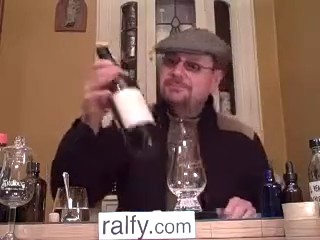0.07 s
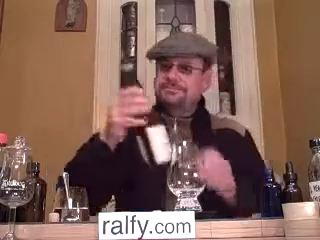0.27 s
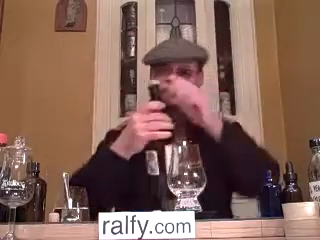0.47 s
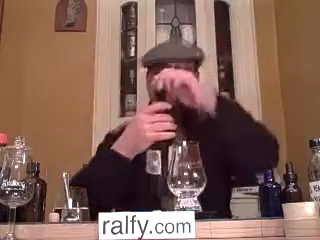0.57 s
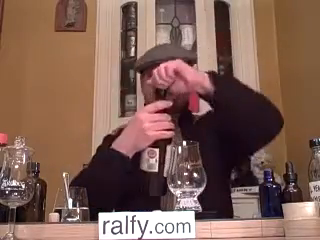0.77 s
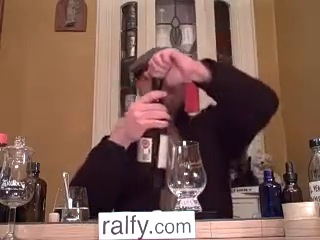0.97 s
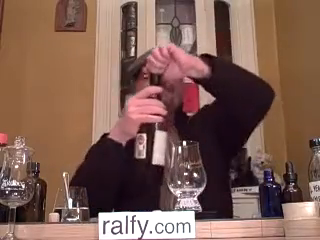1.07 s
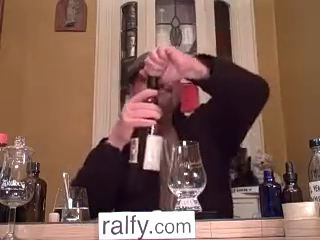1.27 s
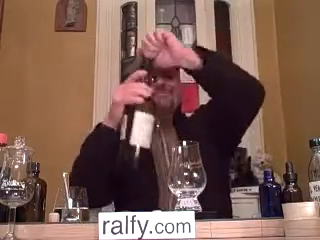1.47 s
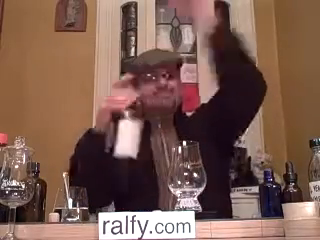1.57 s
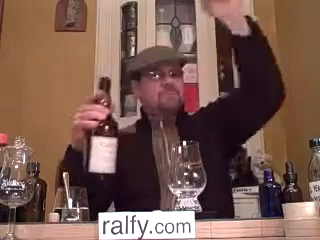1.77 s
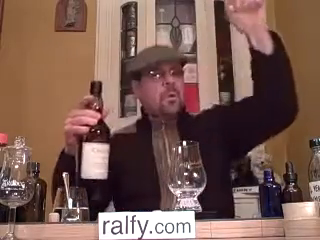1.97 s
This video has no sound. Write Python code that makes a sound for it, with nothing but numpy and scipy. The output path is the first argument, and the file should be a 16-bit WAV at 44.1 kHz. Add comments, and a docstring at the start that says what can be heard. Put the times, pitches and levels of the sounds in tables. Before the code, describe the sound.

A cork pops sharply from a glass bottle after quiet handling, leaving a short hollow ring indoors

```python
"""A cork is pulled from a glass bottle in a small quiet room, with a low wavering hum and microphone hiss throughout.
First a soft rustle fades out under soft low bumps of hands, a few tiny clicks and a faint glassy tone.
Then air squeaks past the slipping cork (rising sines, noise), and the neck pops: a gliding sine over a burst.
The neck tone hangs and beats in the room; small resonant clicks, a glassy tone and a last bump follow."""
import sys
import numpy as np
from scipy import signal
from scipy.fft import rfft, irfft, next_fast_len
from scipy.io import wavfile
from scipy.ndimage import map_coordinates

SR = 44100
rng = np.random.default_rng(int(sys.argv[2]) if len(sys.argv) > 2 else 0)


def store_pcm(level_fs):
    """Save levels as 16-bit WAV."""
    pcm = np.round(np.clip(level_fs, -1, 1) * 32767).astype(np.int16)
    wavfile.write(sys.argv[1], SR, np.atleast_2d(pcm).T)


def volts_from_db(level):
    """Convert decibel levels to linear amplitude ratios."""
    exponent = np.asarray(level, float) / 20
    return 10 ** exponent


N = 89567
T = np.arange(N) / SR


def noise():
    """White noise, rms 1."""
    return rng.standard_normal(N)


def unit(x):
    """Scales to rms 1."""
    return x / np.sqrt(np.mean(x ** 2) + 1e-20)


def impulse(t_s):
    """A single unit sample."""
    return (np.arange(N) == round(t_s * SR)) * 1.


def sine(hz):
    """Sine of peak 1 whose phase sums a varying frequency."""
    return np.sin(2 * np.pi * np.cumsum(hz) / SR)


def tone(rows):
    """Sine gliding through (t/s, f/Hz, rms level/dB) rows."""
    t_s, hz, db = np.transpose(rows)
    level = volts_from_db(np.interp(T, t_s, db, left=-120))
    return np.sqrt(2) * level * sine(np.interp(T, t_s, hz))


def dying(start_s, t60_s):
    """Envelope that starts at once and decays exponentially."""
    return (T >= start_s) * volts_from_db(-60 * np.clip(T - start_s, 0, None) / t60_s)


def colour(x, points):
    """Zero-phase filter through (f/Hz, gain/dB) points, interpolated in log frequency."""
    size = next_fast_len(len(x) + 8192)
    f, db = np.transpose(points)
    log_hz = np.log(np.fft.rfftfreq(size, 1 / SR) + 1)
    gain = volts_from_db(np.interp(log_hz, np.log(f + 1), db))
    return irfft(rfft(x, size) * gain, size)[:len(x)]


# reverberation: (f/Hz, t60/s)
ROOM_DECAY = [(60, 0.43), (200, 0.44), (500, 0.3), (800, 0.66), (1300, 0.56), (2200, 0.31), (3200, 0.29),
              (4400, 0.29), (6000, .3), (8000, .27)]
ROOM_GAP_S, LUMPY_DB, LUMPS_PER_S = .003, 2, 500


def room(x):
    """Diffuse tail: noise dying at its own speed per frequency, uneven from separate wall echoes."""
    hz, t_s, bins = signal.stft(rng.standard_normal(SR // 2), SR, nperseg=256)
    f, t60_s = np.transpose(ROOM_DECAY)
    decay = volts_from_db(-60 * t_s / np.interp(hz, f, t60_s)[:, None])
    tail = signal.istft(bins * decay, SR, nperseg=256)[1]
    lump_at = np.arange(len(tail)) * LUMPS_PER_S / SR
    lumps = map_coordinates(rng.standard_normal(400), [lump_at])
    tail = tail * volts_from_db(LUMPY_DB * lumps)
    tail = tail / np.linalg.norm(tail)  # unit energy
    tail = np.pad(tail, (round(ROOM_GAP_S * SR), 0))
    return signal.fftconvolve(x, tail)[:N]


def swell(t_s, grow_db_per_ms, cut_db_per_ms):
    """Exponential growth that turns into an exponential cut-off; 1 at t_s."""
    ms = (T - t_s) * 1000
    growing = volts_from_db(np.clip(-grow_db_per_ms * ms, -99, 200))
    cutting = volts_from_db(np.clip(cut_db_per_ms * ms, -99, 200))
    return 2 / (growing + cutting)


# whistles of air past the cork; the last row is an early echo off a surface:
# (t/s, start f/Hz, end f/Hz, level at t/dB, growth/dB per ms, cut-off/dB per ms)
WHISTLES_AND_ECHO = [(1.5881, 3850, 4100, -18, 7, 12), (1.5915, 4250, 4750, -5.5, 7, 13),
                     (1.5892, 7500, 7700, -15, 11, 11), (1.594, 8000, 8100, -23, 12, 12)]
GLIDE_S, SQUEAK_ROOM_DB = 0.0026, -9.5
SEAL_S, SEAL_DB, SEAL_RISE_DB_PER_MS, SEAL_FALL_DB_PER_MS = 1.5895, -25, 6.5, 2.5


def squeak():
    """Whistles grow fast, rise in pitch and are cut as the gap opens; an early echo; hiss as the seal gives way."""
    whistles = np.zeros(N)
    for t_s, hz0, hz1, db, grow, cut in WHISTLES_AND_ECHO:
        hz = np.interp(T, [t_s - GLIDE_S, t_s + GLIDE_S / 2], [hz0, hz1])
        whistles += volts_from_db(db) * swell(t_s, grow, cut) * sine(hz)
    seal = volts_from_db(SEAL_DB) * swell(SEAL_S, SEAL_RISE_DB_PER_MS, SEAL_FALL_DB_PER_MS) * noise()
    return whistles + seal + volts_from_db(SQUEAK_ROOM_DB) * room(whistles)


# neck tone swelling and beating in the room: (t/s, f/Hz, rms level/dB)
NECK_TONE = [(1.5935, 560, -50), (1.5955, 630, -20), (1.601, 700, -16.5), (1.607, 720, -19),
             (1.611, 715, -25), (1.619, 685, -19), (1.627, 710, -24), (1.633, 715, -40), (1.645, 670, -28),
             (1.66, 715, -35), (1.685, 716, -38), (1.7, 716, -33), (1.71, 716, -36), (1.725, 716, -34),
             (1.78, 716, -47), (1.79, 716, -44), (1.81, 716, -50), (1.84, 716, -45), (1.88, 716, -56),
             (1.93, 716, -66), (1.96, 716, -72), (1.972, 710, -54), (2.0, 710, -66)]
# spectrum of the air burst as the room returns it: (f/Hz, relative level/dB)
BURST_SPECTRUM = [(40, -23.5), (160, -14.5), (300, 4), (600, 3.5), (850, -14.5), (1400, -22), (2000, -24.5),
                  (3100, -16), (3700, 2.5), (4400, 3), (5300, -4), (6000, -36.5), (6600, -16.5),
                  (7400, -6.5), (8400, -8.5), (9300, -28)]
BURST_S, BURST_DB = 1.589, 13


def pop():
    """The neck's air resonates as one gliding tone while the burst spreads in the room."""
    burst = colour(room(impulse(BURST_S)), BURST_SPECTRUM)
    burst = burst * (T > BURST_S)  # the zero-phase filter also rings early
    return tone(NECK_TONE) + volts_from_db(BURST_DB) * burst


# small clicks: (t/s, dry peak level/dB, centre f/Hz, width of each filter pass/Hz, room level re dry/dB)
CLICK_ROWS = [(.184, -57, 3000, 1400, -3.5), (0.188, -52.5, 1840, 1000, -2), (.19, -52.5, 3240, 1400, -8),
              (.2, -57, 3300, 1400, -9), (.272, -59, 2000, 1500, -9), (1.04, -57, 1802, 2500, -6),
              (1.626, -37, 1116, 400, -8), (1.788, -47, 3700, 600, 2), (1.799, -49.5, 5500, 2500, 4.5),
              (1.814, -43, 3740, 840, 2.5), (1.818, -38.5, 1680, 1100, 0.5), (1.82, -43, 964, 300, -6),
              (1.822, -67, 3800, 3000, -1), (1.9667, -31, 3600, 4010, -2), (1.968, -48.5, 600, 600, 1),
              (1.971, -36.5, 2230, 1010, -2.5), (1.974, -37, 2600, 1500, -2.5), (1.978, -44, 4800, 600, -3),
              (1.9947, -38, 1310, 900, -1), (1.995, -47.5, 395, 500, 0), (2.001, -43.5, 1280, 514, -5.5),
              (2.013, -55, 1500, 696, -7)]
SCRAPE_DB, SCRAPE_T60_S = -16, 0.026  # re impulse, before the resonance


def clicks():
    """An impulse dragging a short scrape, passed twice through one resonance."""
    out = np.zeros(N)
    for t_s, db, hz, width_hz, room_db in CLICK_ROWS:
        b, a = signal.iirpeak(hz, hz / width_hz, SR)
        scrape = volts_from_db(SCRAPE_DB) * dying(t_s, SCRAPE_T60_S) * noise()
        click = signal.lfilter(b, a, impulse(t_s) + scrape)
        click = signal.lfilter(b, a, click)
        click = click * volts_from_db(db) / np.abs(click).max()
        out += click + volts_from_db(room_db) * room(click)
    return out


# faint glassy tones: (start t/s, f/Hz, level before rise and decay/dB, rise/s, t60/s)
GLASS_TONES = [(1.835, 1000, -48, .1, .45), (.655, 2480, -59, .03, .16)]


def glass():
    """Steady-pitched sines that rise softly and ring away."""
    out = np.zeros(N)
    for t_s, hz, db, rise_s, t60_s in GLASS_TONES:
        rise = 1 - np.exp(-np.clip(T - t_s, 0, None) / rise_s)
        out += volts_from_db(db) * dying(t_s, t60_s) * rise * np.sin(2 * np.pi * hz * T)
    return out


# soft bumps of hands and clothes: (t/s, level of the dip/dB, f/Hz)
BUMP_ROWS = [(0.128, -52, 185), (0.142, -54, 150), (0.261, -52, 190), (0.37, -52, 147), (0.42, -55.5, 95.5),
             (0.603, -51.5, 89), (0.743, -53, 154), (0.868, -54.5, 96), (1.038, -56.5, 80.7),
             (1.131, -57.5, 80), (1.193, -51.5, 232), (1.364, -53, 94.5), (1.437, -50, 145),
             (1.518, -60, 80), (1.905, -52.5, 81.4)]
BUMP_CYCLES, BUMP_LAG_S = .5, 0.00915  # bell half-width; delay of the dip after t
BUMP_RUSTLE_DB, RUSTLE_HZ = -10.5, 600  # re dip; low-pass corner


def bumps():
    """Low dips of pressure, about one cycle long, with a little rustle."""
    out = np.zeros(N)
    b, a = signal.butter(2, RUSTLE_HZ, fs=SR)
    rustle = volts_from_db(BUMP_RUSTLE_DB) * unit(signal.lfilter(b, a, noise()))
    for t_s, db, hz in BUMP_ROWS:
        cycles = (T - t_s - BUMP_LAG_S) * hz
        bell = np.exp(-(cycles / BUMP_CYCLES) ** 2)
        out -= volts_from_db(db) * (np.cos(2 * np.pi * cycles) + rustle) * bell
    return out


# rustle spectrum: (f/Hz, relative level/dB)
SHUFFLE_SPECTRUM = [(150, -20), (350, 0.5), (1300, -4), (2500, -19.5), (5000, -29)]
SHUFFLE_START_DB, SHUFFLE_T60_S = -67, 0.82


def shuffle():
    """Dull noise that fades out from the start."""
    rustle = unit(colour(noise(), SHUFFLE_SPECTRUM))
    return volts_from_db(SHUFFLE_START_DB) * rustle * dying(0, SHUFFLE_T60_S)


# low hum: (t/s, f/Hz, rms level before waver/dB)
HUM_TONE = [(0.0, 36.7, -62), (0.12, 38.1, -92), (0.15, 38.4, -71.5), (0.61, 38.29, -60.5),
            (1.51, 38.6, -64), (1.6, 37.8, -70), (1.64, 39.7, -62), (1.74, 38.4, -65.5), (1.85, 34, -74),
            (2.03, 32.9, -71)]
HUM_WAVER_DB, WAVER_PER_S = 2, 9


def hum():
    """A low gliding sine whose level wavers at random."""
    waver = map_coordinates(rng.standard_normal(40), [T * WAVER_PER_S])
    return tone(HUM_TONE) * volts_from_db(HUM_WAVER_DB * waver)


# hiss spectrum: (f/Hz, relative level/dB)
HISS_SPECTRUM = [(29, -40), (50, -8), (72, -14.5), (142, -17.5), (380, -18.5), (655, -24.5), (763, -23.5),
                 (888, -29), (1030, -27), (2530, -30), (6050, -35), (9150, -47), (11900, -74.5),
                 (20100, -120)]
HISS_DB = -65


def mic_hiss():
    """Steady coloured noise of the microphone."""
    return volts_from_db(HISS_DB) * unit(colour(noise(), HISS_SPECTRUM))


# overall treble limit, steep near 9 kHz: (f/Hz, gain/dB)
TREBLE_LIMIT = [(20, 3), (8600, 0.5), (9200, -16), (9800, -55.5), (16000, -62)]


def limit_treble(x):
    """Filters all sources alike: the treble falls steeply near 9 kHz."""
    return colour(x, TREBLE_LIMIT)


def scene():
    """All sources, mono, with full treble."""
    mix = squeak() + pop() + clicks() + glass() + bumps() + shuffle() + hum()
    return mix[None]


def roll_off(x):
    """The treble ends steeply here."""
    return signal.sosfilt(signal.butter(12, 9300, fs=SR, output="sos"), x)


def record(dry):
    """Treble-limited sources plus microphone hiss."""
    mix = limit_treble(dry[0]) + mic_hiss()
    return roll_off(mix[None])


dry = scene()
out = record(dry)
store_pcm(out)
```